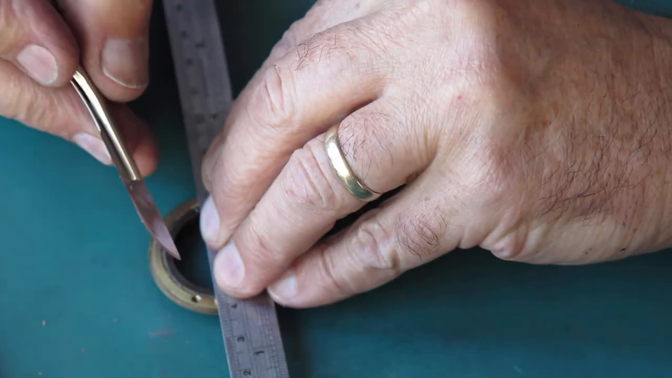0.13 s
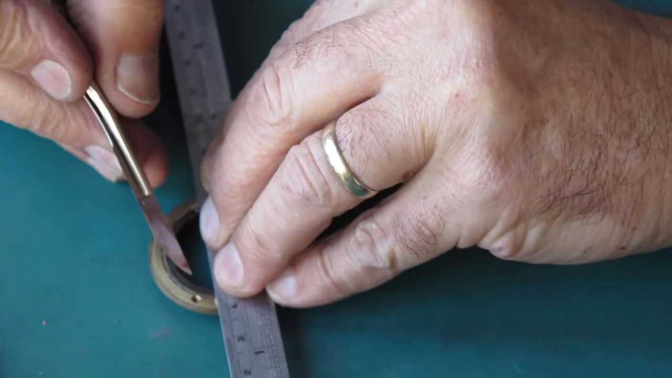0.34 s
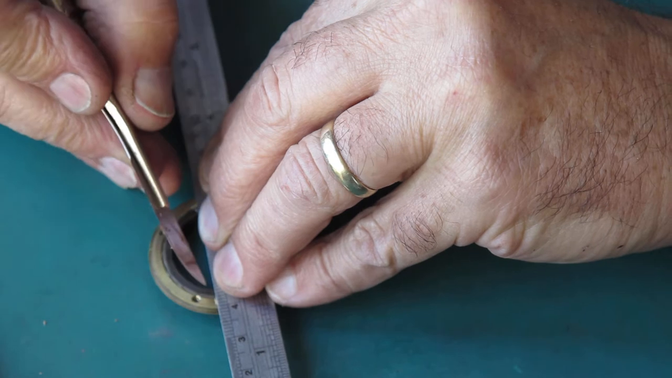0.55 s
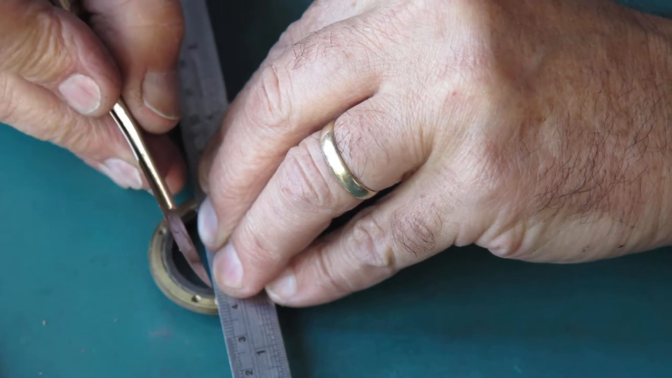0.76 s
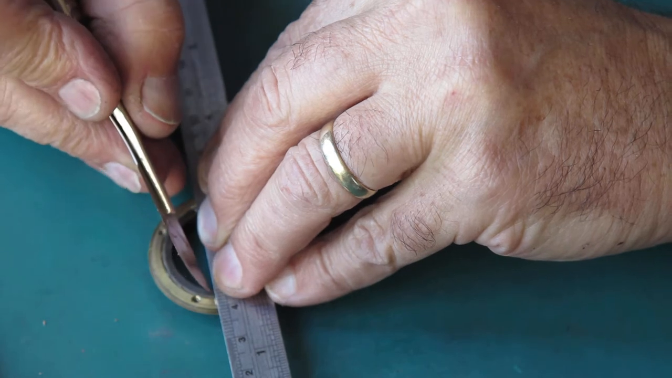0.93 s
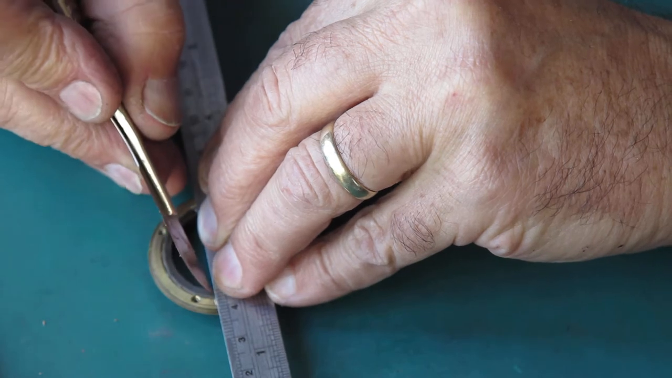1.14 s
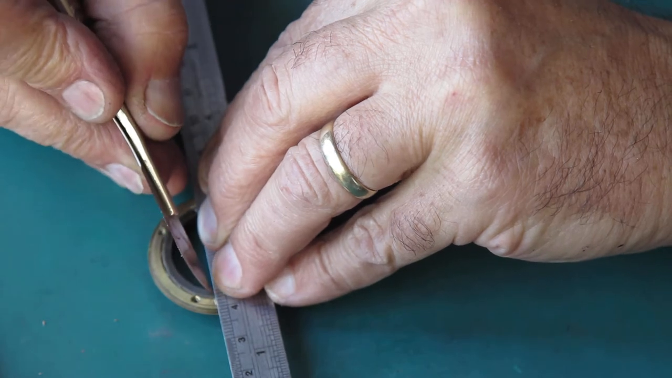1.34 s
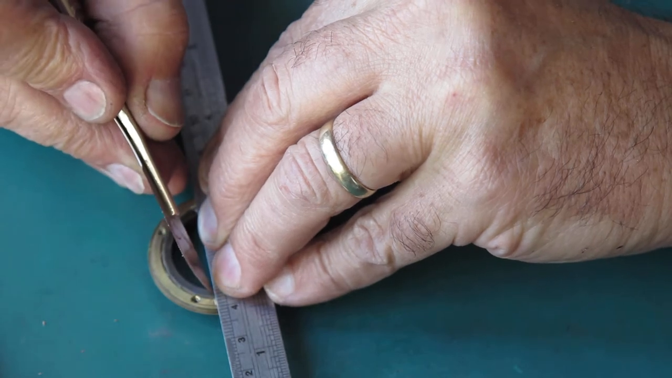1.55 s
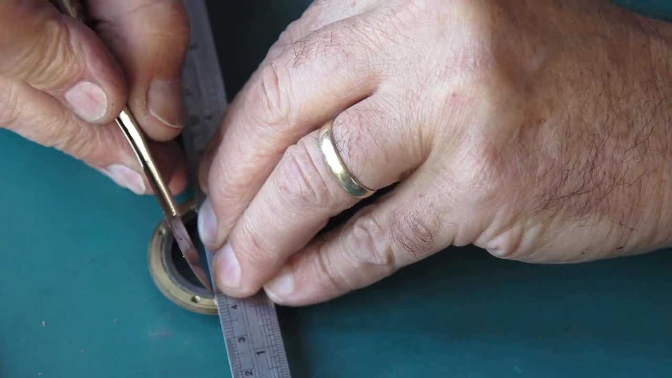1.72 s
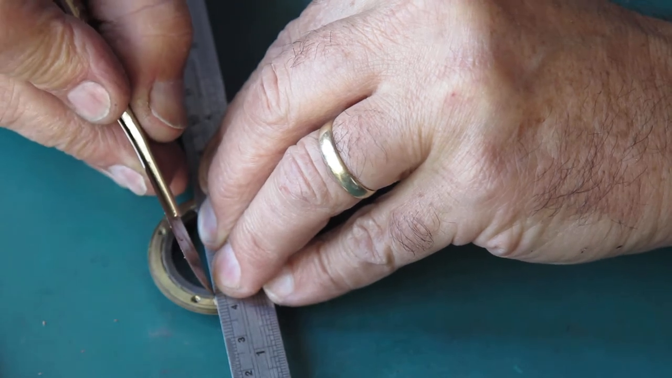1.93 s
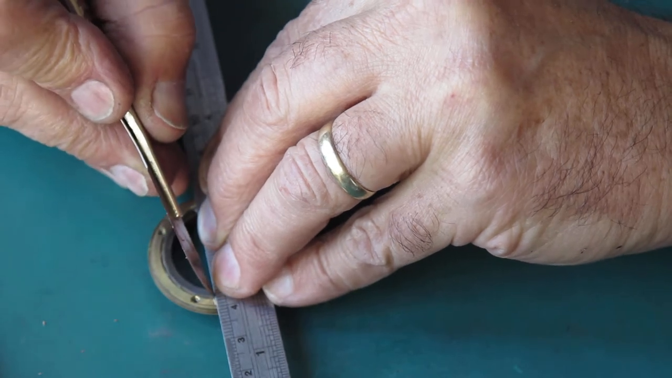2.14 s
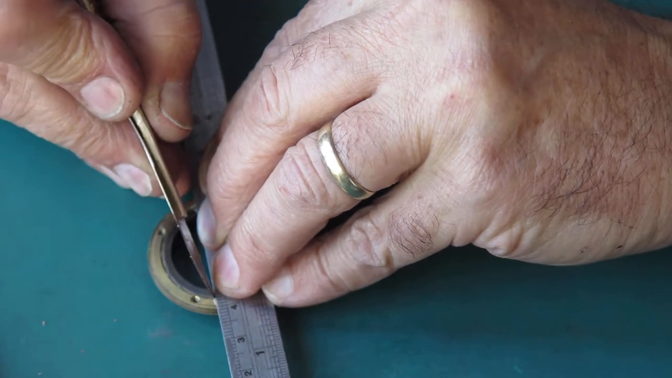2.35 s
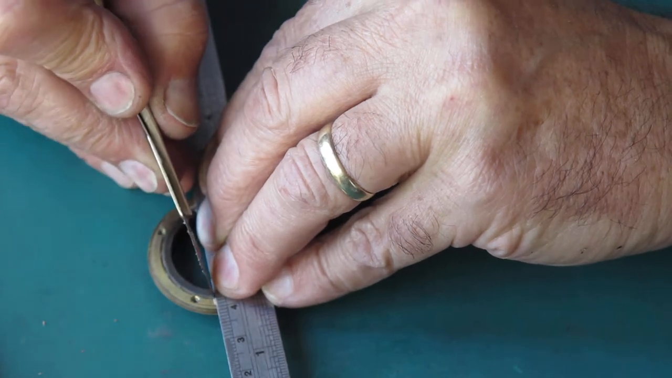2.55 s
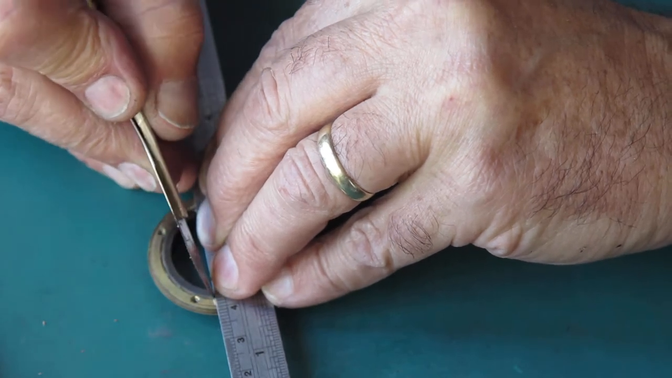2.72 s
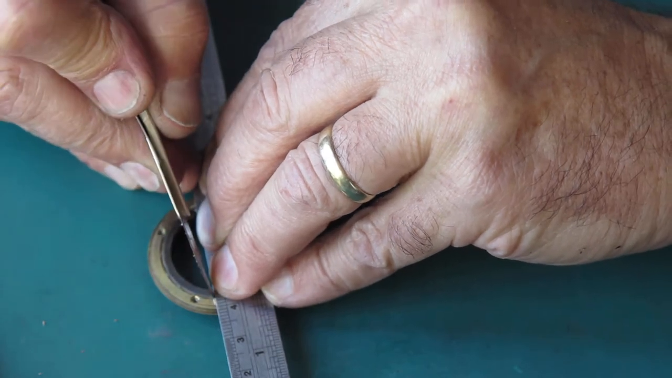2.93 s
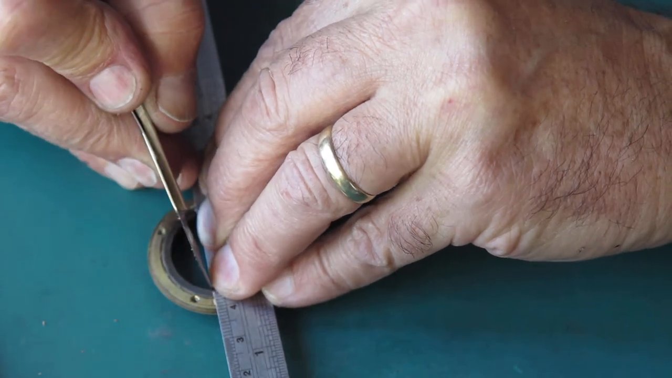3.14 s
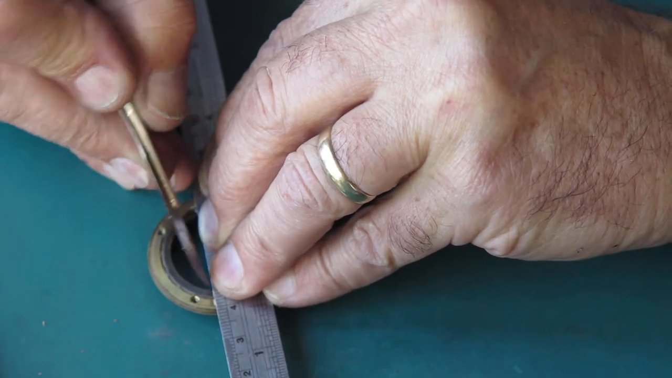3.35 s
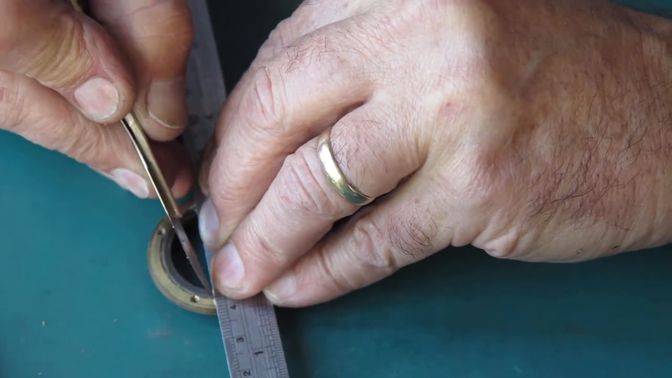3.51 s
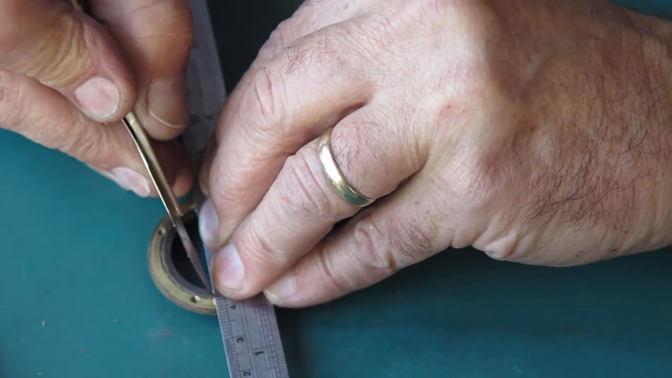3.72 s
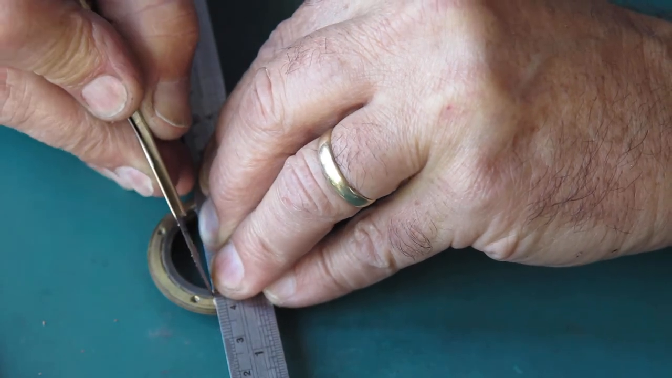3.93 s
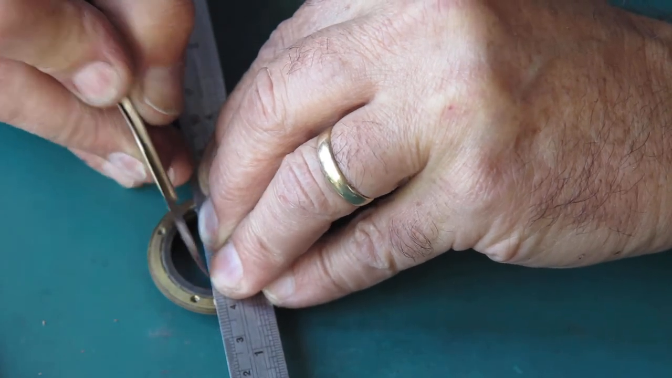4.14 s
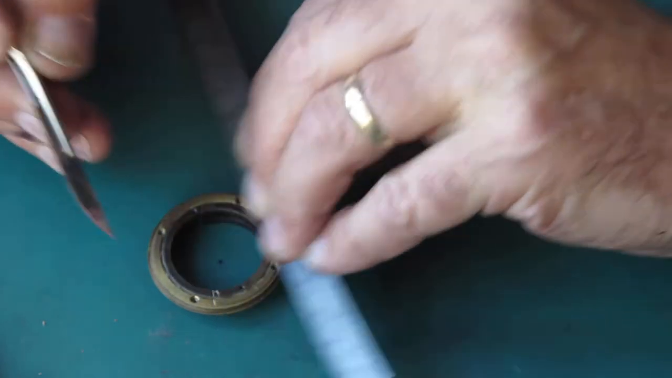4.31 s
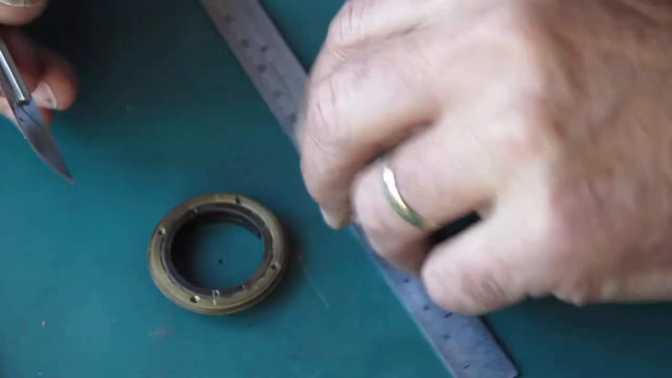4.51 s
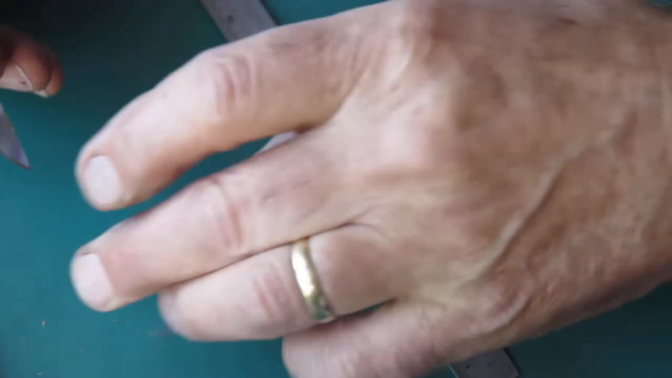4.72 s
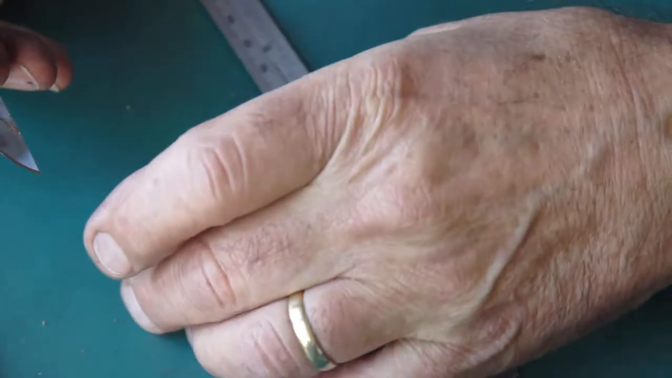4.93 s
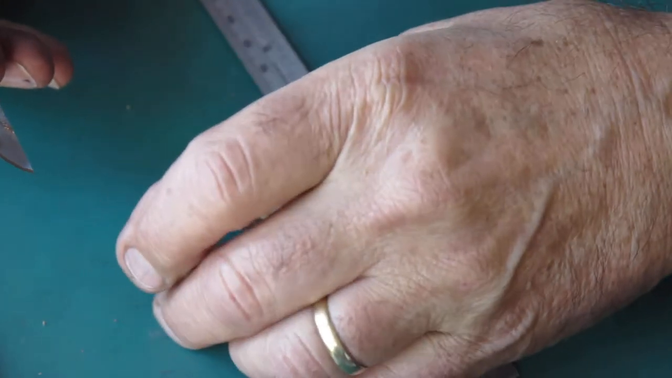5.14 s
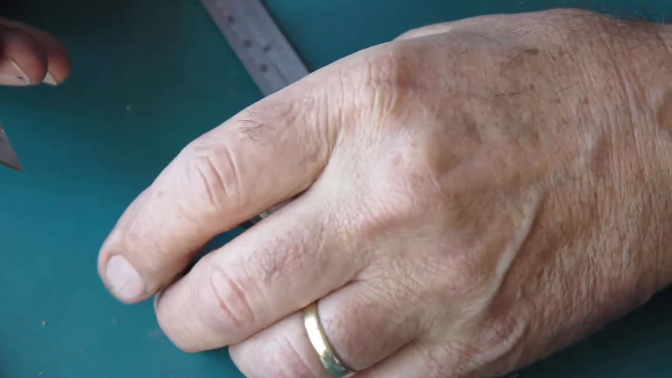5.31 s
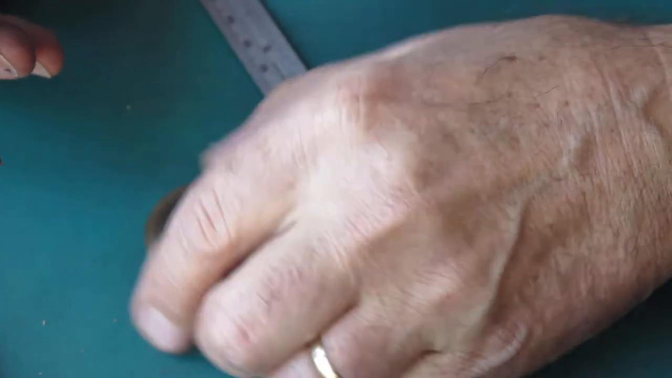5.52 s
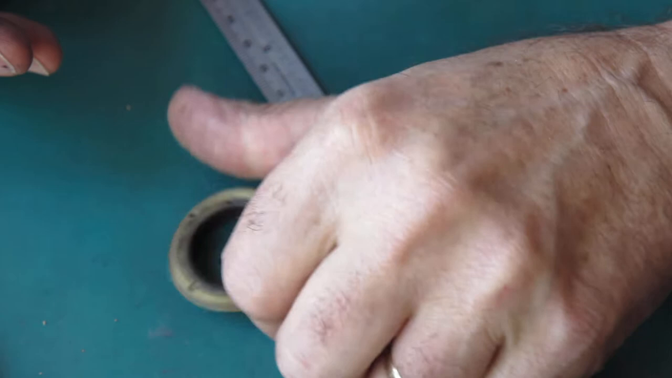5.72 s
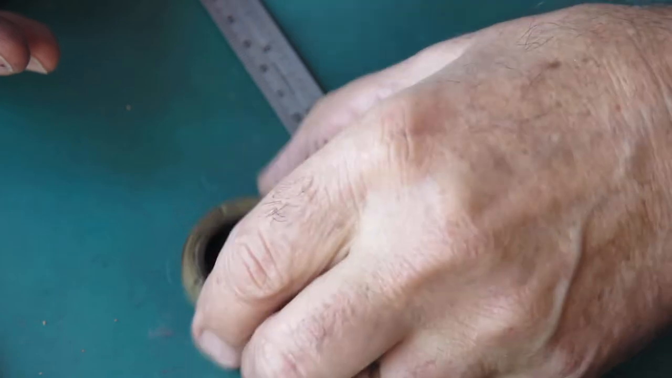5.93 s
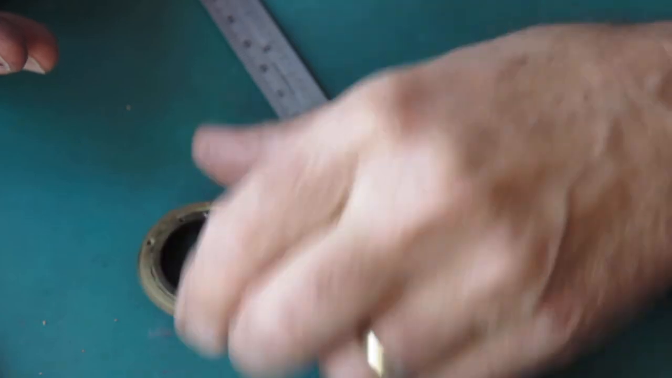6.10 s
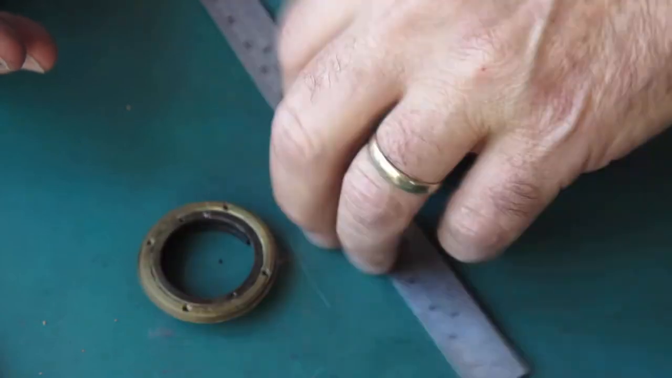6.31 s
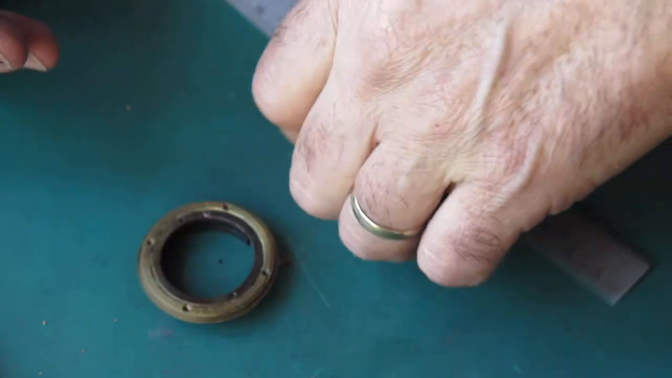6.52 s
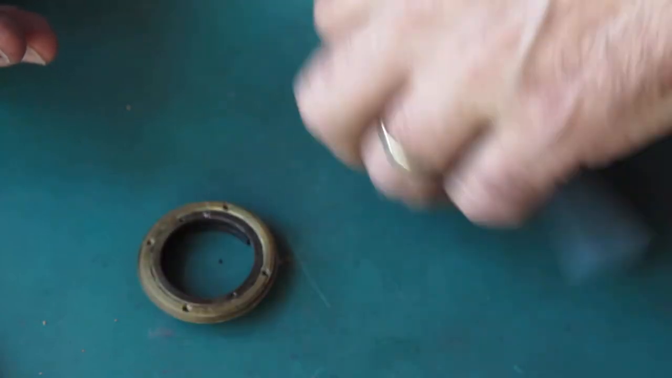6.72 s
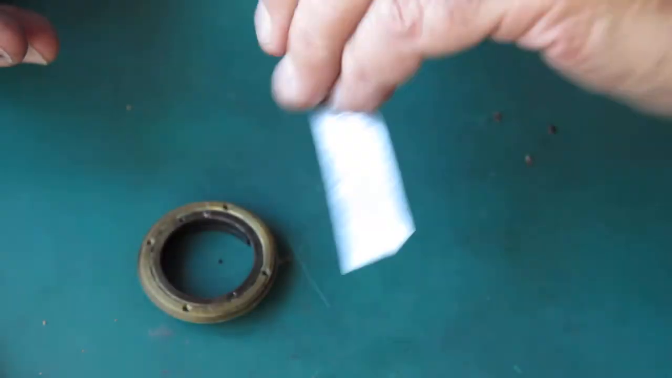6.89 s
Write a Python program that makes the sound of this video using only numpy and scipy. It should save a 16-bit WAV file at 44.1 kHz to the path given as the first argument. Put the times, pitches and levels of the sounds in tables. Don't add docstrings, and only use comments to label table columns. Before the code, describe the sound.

Tiny metallic ticks, a dull bench knock, bright clacks of steel on brass, then a short scrape with stuttering squeaks, above steady hum and hiss.

```python
import sys
import numpy as np
from scipy import signal
from scipy.io import wavfile
from scipy.ndimage import uniform_filter1d

SR = 44100
rng = np.random.default_rng(int(sys.argv[2]) if len(sys.argv) > 2 else 0)


def persist_wave(psi):
    counts = np.round(np.clip(psi, -1, 1) * 32767).astype(np.int16)
    wavfile.write(sys.argv[1], SR, np.atleast_2d(counts).T)


def gain_from_db(level_db):
    decades = np.asarray(level_db, float) / 20
    return 10 ** decades


N = 306936

# frequency in Hz, level in dB per Hz.
HISS = [(22, -40), (50, -12.5), (70, -9), (105, -6), (150, -9), (340, -8.5), (600, -13.5), (1200, -20.5),
        (5500, -27), (7500, -29.5), (10400, -38), (13500, -49.5), (15300, -59), (16500, -75)]
# frequency in Hz, likeness from -1 to 1.
HISS_LIKENESS = [(40, 0.96), (120, -0.3), (220, -0.33), (380, -0.63), (750, -0.38), (1200, 0.068),
                 (2200, -0.052), (9000, 0.15)]
# frequency in Hz, left minus right in dB.
HISS_LEAN = [(60, 4.3), (180, 2.9), (550, 0.99), (1650, 0.93), (4970, 0.1), (15000, 1.2)]
# frequency in Hz, level in dB, width in Hz, start in seconds.
FAN = [
    (38.7, -67, 4.4, 0),
    (116.2, -59.5, 7.01, 0.0054),
    (201.7, -60, 7.85, 1.16),
    (283.3, -53.5, 0.62, 0.09),
    (562, -65.5, 0.49, 0.01),
    (849, -70, 1, 0.067),
    (978, -68, 1.56, 0.0071),
    (1876, -76, 2.7, 0),
]
# time in seconds, gain in dB.
GAIN = [(0, -5), (.9, -2.5), (1.4, -1), (3.1, -1), (3.5, -1.5), (4.2, 0.5), (4.6, -3.5), (5.4, -0.5),
        (6.3, -0.5), (6.96, 0)]

# frequency in Hz, level in dB, t60 in seconds.
STEEL = [(5900, -2, .006), (6600, -.5, .007), (7300, 0, .008), (8000, -3, .006), (9000, -6, .005),
         (10200, -8, .004), (11500, -9, .004), (13000, -10, .003), (14800, -10, .003)]
# frequency in Hz, level in dB, t60 in seconds.
RING_TOP = [(2950, 0, .009), (3450, 0, .009), (4000, 0, .008), (4600, 0, .007), (5250, 0, .007)]
# frequency in Hz, level in dB, t60 in seconds.
RING = [(1120, 0, .018), (1400, 0, .016), (1700, 0, .014), (2050, 0, .013), (2450, 0, .011)]
# frequency in Hz, level in dB, t60 in seconds.
BENCH_TOP = [(420, 0, .045), (520, 0, .04), (630, 0, .04), (760, -1, .035), (910, -2, .03)]
# frequency in Hz, level in dB, t60 in seconds.
BENCH = [(180, -4, .09), (240, 0, .07), (290, 0, .07), (340, 0, .08)]

# time in seconds, deep bench in dB, bench top in dB.
NUDGES = [(0.109, -38, -48), (2.326, -51, -44), (3.479, -51, -44), (3.813, -35, -54), (4.881, -37, -49),
          (4.949, -51, -58), (4.972, -37.5, -51), (5.025, -41, -50), (5.064, -38.5, -65),
          (5.189, -37, -46.5), (5.243, -38, -61), (5.36, -34.5, -45), (5.378, -34.5, -46),
          (5.594, -37.5, -50), (5.747, -36, -39), (6.153, -57, -63)]
# time in seconds, metal in dB, dullness in dB from steel towards ring.
TICKS = [(0.163, -48.5, -10.5), (0.312, -57, -5), (0.3215, -50, -8), (0.4581, -50, -11), (0.4776, -51, -11),
         (0.7135, -56.5, -10), (0.8344, -56, -9), (0.844, -43.5, -9.5), (0.9584, -60, 9),
         (1.4409, -50.5, -1), (1.702, -49.5, 0), (1.916, -45, -6), (1.931, -58, -8), (2.7533, -57.5, -10.5),
         (2.9475, -41.5, -7.5), (3.3174, -48, 0), (3.348, -56, -6), (4.027, -55, -5), (4.172, -49, -9.5),
         (4.2016, -44.5, -10.5), (4.222, -43, -8.5), (6.7478, -55.5, -17)]
# bench top in dB, deep bench in dB.
TICK_PUSH = (-52, -51.5)
# time in seconds, metal in dB, dullness in dB, bench top in dB, deep bench in dB.
PRESSES = [
    (3.114, -49, 8, -40, -36),
    (3.164, -55, 3, -41, -41),
    (3.2137, -29, 2, -19, -19.5),
    (4.049, -51.5, -3, -40, -37),
    (4.0898, -36.5, -1.5, -35, -23),
]
# time in seconds, metal in dB, dullness in dB, bench top in dB, deep bench in dB.
ROCKS = [
    (3.5707, -51.5, 9, -31, -39.5),
    (5.7555, -53, 0.5, -29, -42),
    (5.8122, -35.5, -2, -32, -31),
    (5.8225, -46, -5, -42, -51),
    (5.8457, -30, -1, -22, -26),
    (5.8562, -41, -3, -26.5, -31),
    (5.949, -48, 2, -44, -40),
    (5.9557, -48, 3, -46, -43),
    (6.0669, -52, 3, -34.5, -35),
]
# time in
# seconds, metal in dB, dullness in dB, bench top in dB, deep bench in dB.
CLACKS = [(3.6224, -35, -4, -42, -40.5), (4.262, -27.5, -2.5, -33, -43), (4.2962, -36.5, -1, -55, -39),
          (4.3816, -26.5, -6.5, -26.5, -36), (4.3918, -35, 5.5, -55, -34.5), (4.4412, -27, -5, -31.5, -36),
          (4.445, -34, -8, -30, -30.5), (4.4478, -26.5, -3, -48, -32), (4.451, -30.5, -6, -46, -38),
          (4.5147, -38, -2.5, -52, -38), (6.3085, -23, 0.5, -29, -27), (6.3154, -27.5, -5, -29, -27),
          (6.3238, -33, -7, -34, -33), (6.333, -36, -6, -35, -51), (6.3987, -45, 9, -32, -35.5),
          (6.5326, -45, 0, -44, -41)]
RING_TOP_LIFT = [0.39, 4.5, 3.4, 5.9]
RING_MOVED = (5.7, 6.1)

# time in seconds, level in dB, frequency in Hz, t60 in seconds.
TONES = [(3.2136, -31, 179, 0.17), (3.125, -43, 297, 0.22), (3.2135, -18, 300, 0.041),
         (3.222, -32, 330, 0.071), (3.2138, -32, 498, 0.064), (3.2135, -30, 1950, 0.065),
         (3.2135, -34.5, 3066, 0.045), (4.05, -56, 1780, 0.11), (4.091, -41, 308, 0.18),
         (4.0907, -36.5, 194, 0.23), (4.0905, -38, 478, 0.052), (4.262, -47, 620, 0.031),
         (4.263, -39, 1160, 0.054), (4.262, -28, 3580, .02), (4.263, -30, 5950, .03),
         (4.262, -37.5, 890, 0.048), (4.273, -33, 4050, 0.028), (4.2975, -36.5, 656, 0.053),
         (4.2975, -38, 1970, .06), (4.385, -37, 480, 0.061), (4.382, -34, 1353, .08),
         (4.384, -40, 1740, .07), (4.383, -24, 6380, .03), (4.4418, -30, 1900, .07),
         (4.4415, -27.5, 4475, .04), (4.449, -36, 486, 0.046), (4.449, -41, 1440, .05),
         (5.749, -33, 410, 0.054), (5.7553, -35.5, 474, 0.057), (5.754, -32, 850, 0.045),
         (5.767, -56, 3500, .03), (5.754, -43, 4600, .03), (5.814, -28, 520, .045), (5.815, -32, 758, .1),
         (5.8461, -30, 332, 0.095), (5.8466, -40, 616, 0.083), (5.8466, -32, 1053, .06),
         (5.8454, -28.5, 2780, 0.025), (6.3085, -26, 6300, .03), (6.31, -24, 3270, 0.046),
         (6.308, -34, 1900, .09), (6.311, -32, 1077, 0.08), (6.321, -47, 950, 0.054),
         (6.308, -31.5, 10000, .015), (6.328, -35, 320, .12), (6.349, -43, 420, .08),
         (6.395, -41, 790, .05),
         (3.2135, -37, 10900, 0.011), (3.2135, -28, 12300, .012), (3.623, -34, 12200, .012),
          (4.0905, -32, 12300, .012), (4.0905, -30, 14000, .01), (4.262, -21, 14500, .008),
          (4.262, -12, 16000, 0.007), (4.262, -35, 5030, .012), (4.1726, -32, 14500, .006),
          (4.222, -46, 7300, 0.014), (0.163, -44, 6000, 0.018), (0.844, -41, 6310, .03),
          (1.916, -44, 8100, .02), (1.916, -46, 5500, .02), (0.163, -50, 4500, .015),
          (0.844, -45, 4600, .015), (0.458, -51, 4500, .015), (4.273, -34, 7000, .015),
          (2.9476, -43, 6500, .025), (3.2135, -36, 6760, 0.013), (4.383, -25, 5200, .015),
          (4.3925, -34, 6200, .015), (5.8128, -50, 10060, 0.008), (5.8462, -46, 10100, .008),
          (5.857, -35, 5940, 0.022), (6.6105, -34, 3320, .025), (6.657, -39, 3280, 0.02),
          (6.7065, -42, 3490, 0.017), (6.7481, -42, 7240, .015),
         (3.116, -44, 1080, .06), (3.2135, -33, 2300, .03), (3.2135, -35, 3900, .03),
         (3.2135, -31, 1080, .07), (3.24, -35, 620, .1), (3.3, -38, 350, .1), (3.572, -44, 1000, .05),
         (3.572, -46, 2320, .02), (3.607, -48, 2500, .02), (3.607, -48, 3950, .02), (3.626, -42, 2600, .03),
         (4.262, -41, 480, .04), (4.297, -37, 440, .045), (4.384, -32, 270, .06), (4.384, -37, 800, .04),
         (5.752, -32, 330, .07), (5.814, -34, 640, .04), (5.846, -31, 460, .04), (6.459, -40, 7000, .02),
         (6.47, -42, 7200, .02), (6.503, -42, 4600, .015), (6.504, -42, 8000, .015)]
# start in seconds, length in seconds, level in dB, first and last frequency in Hz.
CHIRPS = [(0.955, .012, -56, 1600, 2400), (1.959, .016, -50, 1100, 2500), (3.959, .012, -54, 1600, 2800),
          (6.589, .011, -44, 1150, 2100), (6.597, .007, -37, 2900, 3900), (6.597, .017, -29.5, 1050, 1680),
          (6.608, .006, -37, 2900, 3600), (6.612, .007, -33, 1650, 1100), (6.618, .006, -36, 1300, 1700),
          (6.625, .006, -38, 1300, 1850), (6.704, .006, -46, 1300, 1900)]
# start in seconds, metal in dB, dullness in dB, t60 in seconds.
RATTLES = [(1.92, -51.5, 2, 0.4), (3.24, -54, 15.5, 0.2), (4.05, -52, 3, 0.21), (4.088, -48, -2, 0.37),
           (4.269, -51, 6, .14), (4.297, -42, -2, 0.28), (4.459, -43, 2.5, 0.36), (5.86, -47.5, 1, 0.64),
           (5.955, -51, -2.5, .3), (6.312, -40, -5, 0.25), (6.32, -28, -1.5, 0.29)]
# time in seconds, level in dB, frequency in Hz, t60 in seconds.
SINGS = [(3.116, -42.5, 920, 0.054), (3.116, -47.5, 1393, 0.2), (3.116, -49, 2330, 0.15),
         (3.215, -30.5, 9080, 0.033), (3.214, -33, 13300, 0.022), (3.571, -64, 2350, .06),
         (3.607, -48, 5300, 0.018), (3.624, -33, 5960, 0.021), (3.624, -37.5, 9800, 0.037),
         (3.623, -33, 13200, 0.021), (3.623, -29, 15000, .02), (4.049, -46.5, 2340, 0.14),
         (4.265, -39, 4110, 0.074), (5.952, -49, 1470, 0.042), (6.31, -37, 864, 0.063)]
# start in seconds, length in seconds, metal in dB, dullness in dB.
SLIDES = [(3.291, 0.077, -51.5, 0.5), (4.04, 0.057, -54, 5), (4.479, 0.063, -48.5, 1),
          (4.852, 0.25, -63, -1.5), (5.093, 0.21, -67.5, -5.5), (5.297, 0.16, -65, -5),
          (5.452, 0.2, -59, -4), (5.988, 0.11, -58.5, -4.5), (6.183, 0.11, -58.5, -4),
          (6.282, 0.042, -56, -5.5), (6.435, 0.06, -44, -6), (6.494, 0.035, -41.5, -2)]
# loudest point in seconds, release in seconds, level in dB, slip rate in Hz, roughness 0 to 1.
SQUEAKS = [
    (6.49, 0.0092, -41, 1310, 0.4),
    (6.505, 0.02, -39.5, 1252, 0.3),
    (6.603, .004, -42, 1300, 0.4),
    (6.6115, 0.0062, -35, 1621, 0.5),
    (6.622, 0.0066, -36, 1538, 0.42),
    (6.633, 0.0093, -42, 1382, 0.2),
    (6.649, 0.012, -47, 1500, .4),
]
# loudest point in seconds, release in seconds, level in dB, slip rate in Hz, roughness 0 to 1.
SKIPS = [
    (6.657, 0.017, -37.5, 1170, 0.96),
    (6.667, 0.015, -43, 1100, 0.83),
    (6.7065, 0.0099, -41, 1732, 0.32),
    (6.715, 0.019, -48, 1780, .6),
]
# level in dB, share of the slip rate.
GLIDE = [(-38, .05), (-28.5, .32)]
# slip rate in Hz, fall in dB per overtone.
OVERTONES = [(1200, 25), (1750, 4)]

# delay in seconds, level in dB.
ECHOES = [(.0022, -14), (.0045, -18.5), (0.01, -14), (0.0177, -41)]
# frequency in Hz, t60 in seconds.
ROOM = [(200, 0.21), (600, 0.47), (1500, 0.24), (4000, 0.24), (8000, 0.31), (13000, 0.2)]
# frequency in Hz, likeness 0 to 1.
ROOM_LIKENESS = [(150, 0.89), (600, 0.76), (2000, 0.68), (4500, 0.1), (9000, 0.033)]
# frequency in Hz, level in dB.
CAPSULE = [(8000, 0.5), (9500, 1.5), (11000, -2), (12500, -10), (14000, -19), (16000, -48), (18000, -61)]
# frequency in Hz, left minus right in dB.
PORTS = [(100, 3), (400, 2.5), (1000, 1.5), (2400, .5), (4000, -1.5), (6000, -6.5), (7500, -8), (8800, -1),
         (10000, 7), (12000, 14), (15000, 12)]


def evened(x):
    return x / np.sqrt(np.mean(x ** 2) + 1e-20)


def at_peak(x, db):
    loudest = uniform_filter1d(x ** 2, size=176).max()
    return gain_from_db(db) * x / np.sqrt(loudest + 1e-20)


def read(points, hz):
    f, value = np.transpose(points)
    return np.interp(np.log(hz + 1), np.log(f + 1), value)


def add(mix, s, sound):
    part = mix[round(s * SR):][:len(sound)]
    part += sound[:len(part)]


def band_pass(x, order, edges):
    return signal.sosfilt(signal.butter(order, edges, "band", fs=SR, output="sos"), x)


def hiss():
    frames, hz = N // 512 + 5, np.fft.rfftfreq(2048, 1 / SR)
    a, b, c, d, patches = rng.standard_normal((frames, 1025, 5)).T
    patches = evened(uniform_filter1d(uniform_filter1d(patches, 12, 0), 6, 1))
    same = read(HISS_LIKENESS, hz)[:, None]
    left = a + 1j * b
    right = same * left + np.sqrt(1 - same ** 2) * (c + 1j * d)
    lean_db = np.outer([0.5, -0.5], read(HISS_LEAN, hz))[:, :, None]
    z = np.array([left, right]) * gain_from_db(read(HISS, hz)[:, None] + 1.1 * patches) * gain_from_db(lean_db)
    x = signal.istft(z, nperseg=2048, noverlap=1536)[1][:, :N]
    middle = band_pass(x.mean(0), 4, [1200, 6000])
    return gain_from_db(-57.5) * x / middle.std()


def fan():
    t, out = np.arange(N) / SR, np.zeros((2, N))
    knots = np.linspace(0, N / SR, 120)
    port_lag = np.array([[0], [0.2]])
    for hz, db, width, start in FAN:
        drift, swell = (np.interp(t, knots, curve) for curve in rng.standard_normal((2, 120)))
        turn = 2 * np.pi * (hz * t + width * np.cumsum(drift) / SR)
        line = np.sin(turn + port_lag) * gain_from_db((0.76 + 0.3 * width) * swell)
        fade_in = np.clip((t - start) / 0.35 + 1, 0, 1)
        out += gain_from_db(db) * line / line.mean(0).std() * fade_in
    return out


def ring(modes, chance, metal=True):
    hz, db, t60 = np.transpose(modes)[:, :, None]
    hz = hz * (1 + 0.04 * chance[:len(hz), :1])
    db = db + 2 * chance[:len(hz), 1:]
    t = np.arange(4000) / SR
    sign = (-1.) ** (np.arange(len(hz))[:, None] * metal)
    body = (sign * gain_from_db(db - 60 * t / t60) * np.sin(2 * np.pi * hz * t)).sum(0)
    return band_pass(body, 1 + metal, [0.8 * hz.min(), 1.25 * hz.max()])


def nudges():
    out = np.zeros(N)
    push = signal.windows.hann(40) / 20
    for s, db, top_db in NUDGES:
        chance = rng.uniform(-1, 1, (8, 2))
        deep = at_peak(ring(BENCH, chance, False), db - 5.5)
        top = at_peak(ring(BENCH_TOP, chance, False), top_db + 0.5)
        add(out, s, signal.oaconvolve(push, deep + top))
    return out


def metals(db, dull_db, top_db=0.):
    return db - dull_db, db + top_db, db + dull_db


def blows():
    ticks = [(*row, *TICK_PUSH) for row in TICKS]
    out = []
    for table, top_db in zip((ticks, CLACKS, PRESSES, ROCKS), RING_TOP_LIFT):
        for s, db, dull_db, *bench_db in table:
            out.append((s, *metals(db, dull_db, top_db), *bench_db))
    return sorted(out)


def hits():
    near, t = np.zeros(N), np.arange(300) / SR
    far = np.zeros((3, N))
    for k, (s, *levels_db) in enumerate(blows()):
        chance, grit = rng.uniform(-1, 1, (5, 9, 2)), rng.standard_normal((2, 300))
        chatter = grit[0] * (abs(grit[1]) > 1.5) * np.exp(-t / 0.0022)
        chatter[8] = 3.8
        chatter /= np.linalg.norm(chatter)
        steel = STEEL[:4] if RING_MOVED[0] < s < RING_MOVED[1] else STEEL
        groups = (steel, True, 1.4), (RING_TOP, True, 1.6), (RING, True, 1.8), (BENCH_TOP, False, 2.2), \
            (BENCH, False, 2.6)
        bodies = [at_peak(ring(modes, c, metal), db - less_db)
                  for (modes, metal, less_db), c, db in zip(groups, chance, levels_db)]
        metal, bench = sum(bodies[:3]), sum(bodies[3:])
        snap = band_pass(grit[1] * np.exp(-t / 0.0009), 4, [2200, min(steel[-1][0], 10500) - 300])
        add(near, s, signal.oaconvolve(chatter, metal))
        add(near, s, bench)
        add(near, s, at_peak(snap, levels_db[1] - 8))
        add(far[k % 3], s, metal + bench)
    return near, far


def tones():
    out, t = np.zeros(N), np.arange(8000) / SR
    rise = 1 - np.exp(-t / 0.0003)
    for s, db, hz, t60 in TONES:
        twin = 0.23 * np.sin(2 * np.pi * hz * 1.042 * t)
        pair = np.sin(2 * np.pi * hz * t) + twin
        add(out, s, gain_from_db(db - 60 * t / t60) * pair * rise)
    return out


def chirps():
    out = np.zeros(N)
    for s, length, db, from_hz, to_hz in CHIRPS:
        hz = np.linspace(from_hz, to_hz, round(length * SR))
        turn = 2 * np.pi * np.cumsum(hz) / SR
        tone = np.sin(turn) + 0.2 * np.sin(2 * turn)
        add(out, s, gain_from_db(db + 3) * tone * signal.windows.tukey(len(hz), 0.7))
    return out


def stroke(shape, db, dull_db):
    side, when, size = rng.random((SR, 3))[:len(shape)].T
    slips = np.sign(side - 0.5) * (when < 2600 / SR)
    slips = slips * gain_from_db(-3.2 * np.log(size + 0.02))
    sound = np.zeros(len(shape))
    for modes, level_db, less_db in zip((STEEL[:8], RING_TOP, RING), metals(db, dull_db), [5.5, 4.5, 4.2]):
        body = signal.oaconvolve(slips, ring(modes, np.zeros((9, 2))))[:len(shape)]
        sound += gain_from_db(level_db - less_db) * evened(body)
    return sound * shape


def rattle(s, db, dull_db, t60):
    t = np.arange(0, t60 * 29 / 60, 1 / SR)
    rise = np.minimum(t / 0.0016, 1)
    return s, stroke(rise * gain_from_db(-60 * t / t60), db, dull_db)


def sings():
    out, t = np.zeros(N), np.arange(8000) / SR
    rise = 1 - np.exp(-t / 0.00061)
    for s, db, hz, t60 in SINGS:
        cluster = hz * (1 + 0.035 * (1 + hz / 5000) * rng.uniform(-1, 1, (7, 1)))
        voices = np.sin(2 * np.pi * cluster * t).sum(0) / 2
        add(out, s, gain_from_db(db - 60 * t / t60) * voices * rise)
    return out


def slide(s, length, db, dull_db):
    return s, stroke(signal.windows.tukey(round(length * SR), 0.53), db, dull_db)


def resonate(x, hz, width):
    turn = np.exp(2j * np.pi * np.cumsum(hz * np.ones(len(x))) / SR)
    r = np.exp(-np.pi * width / SR)
    return 2 * (turn * signal.lfilter([1 - r], [1, -r], x / turn + 1e-18)).real


def squeak(s, release, level_db, rate_hz, rough, rise):
    t = np.arange(-rise, release, 1 / SR)
    db = level_db - 31 * np.maximum(-t / rise, t / release) ** 3.2
    glide = np.interp(level_db, *np.transpose(GLIDE))
    hz = rate_hz * (1 - glide * np.tanh(abs(t) / 0.009))
    fall_db = read(OVERTONES, rate_hz)
    noise = rng.standard_normal(SR // 4)[:len(t)]
    jitter = 0.072 * evened(uniform_filter1d(noise, 90))
    turns = np.cumsum(hz * (1 + jitter)) / SR
    tone, fuzz = np.zeros(len(t)), np.zeros(len(t))
    for k in range(4):
        overtone_hz = (k + 1) * hz
        tone += gain_from_db(-fall_db * k) * np.sin(2 * np.pi * (k + 1) * turns)
        fuzz += gain_from_db(-0.6 * fall_db * k) * resonate(resonate(noise, overtone_hz, 1200), overtone_hz, 1300)
    sound = (1 - rough) * evened(tone) + rough * evened(fuzz)
    return s - rise, gain_from_db(db) * sound * signal.windows.tukey(len(t), 0.12)


def tail():
    taps = np.zeros((2, SR // 2))
    slots = np.arange(200, SR // 2 - 20, 20)
    at = slots + rng.integers(0, 20, (2, len(slots)))
    np.put_along_axis(taps, at, rng.choice([-1., 1.], at.shape), 1)
    hz, t, z = signal.stft(taps, SR, nperseg=256)
    same = read(ROOM_LIKENESS, hz)[:, None]
    z[1] = same * z[0] + np.sqrt(1 - same ** 2) * z[1]
    decay = gain_from_db(-60 * t / read(ROOM, hz)[:, None])
    out = signal.istft(z * decay, SR, nperseg=256)[1]
    return gain_from_db(-5.0) * out / np.linalg.norm(out[0])


def room(near, far):
    early = np.zeros((2, 1000))
    early[:, 0] = 1
    for s, db in ECHOES:
        at = round(s * SR)
        early[[0, 1], [at, at + 3]] += gain_from_db(db)
    wet = sum(signal.oaconvolve(x[None], tail(), axes=1)[:, :N] for x in far)
    return signal.oaconvolve(near[None], early, axes=1)[:, :N] + wet


def ports(x):
    hz = np.linspace(0, SR / 2, 129)
    pair = []
    for side in (1, -1):
        gain = gain_from_db(2 * read(CAPSULE, hz) + side * read(PORTS, hz)) + 1e-5
        pair.append(signal.minimum_phase(signal.firwin2(255, hz, gain, fs=SR)))
    x = signal.sosfilt(signal.butter(3, 125, "high", fs=SR, output="sos"), x)
    return signal.oaconvolve(x, np.array(pair), axes=1)[:, :N]


def scene():
    near, far = hits()
    rubbing = sings() + tones() + nudges()
    for source, table in (rattle, RATTLES), (slide, SLIDES):
        for row in table:
            add(rubbing, *source(*row))
    squeaks = chirps()
    for table, rise_s in (SQUEAKS, 0.015), (SKIPS, 0.002):
        for row in table:
            add(squeaks, *squeak(*row, rise_s))
    far[0] += rubbing + gain_from_db(-5) * squeaks
    work = ports(room(near + rubbing + squeaks, far))
    s, db = np.transpose(GAIN)
    gain = gain_from_db(np.interp(np.arange(N) / SR, s, db))
    return work + (hiss() + fan()) * gain


def low_pass(x):
    return signal.sosfilt(signal.butter(12, 16490, fs=SR, output="sos"), x)


def record(dry):
    return low_pass(dry)


dry = scene()
out = record(dry)
persist_wave(out)
```